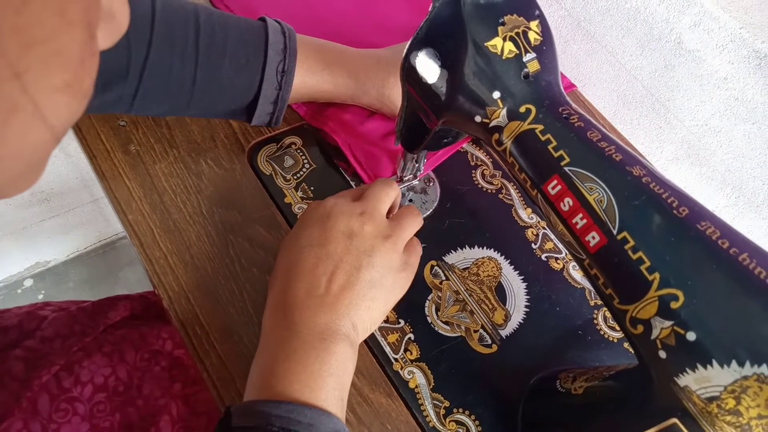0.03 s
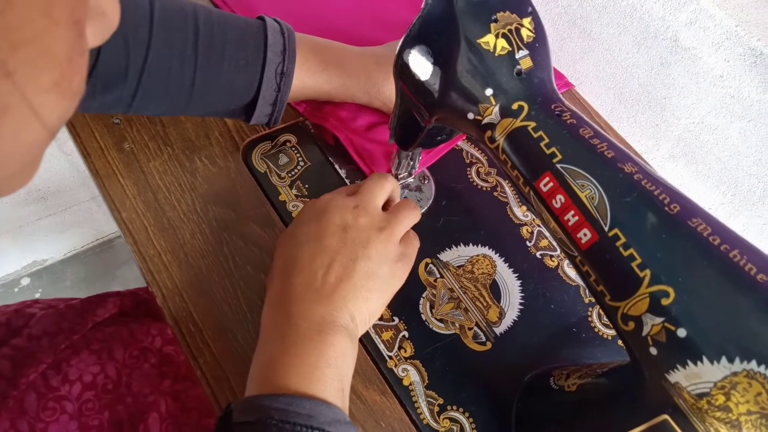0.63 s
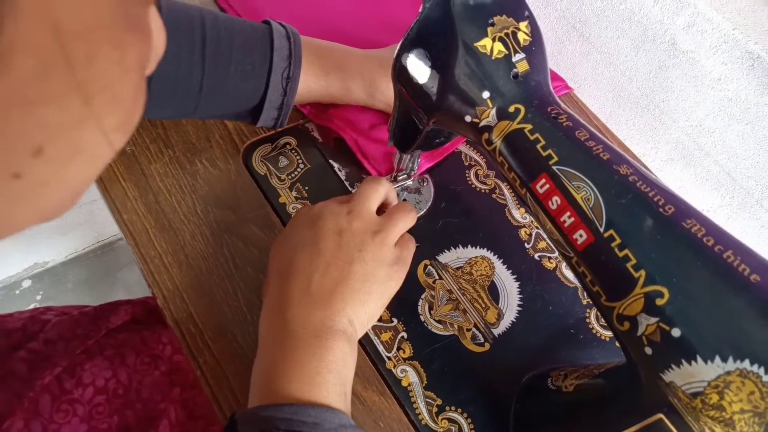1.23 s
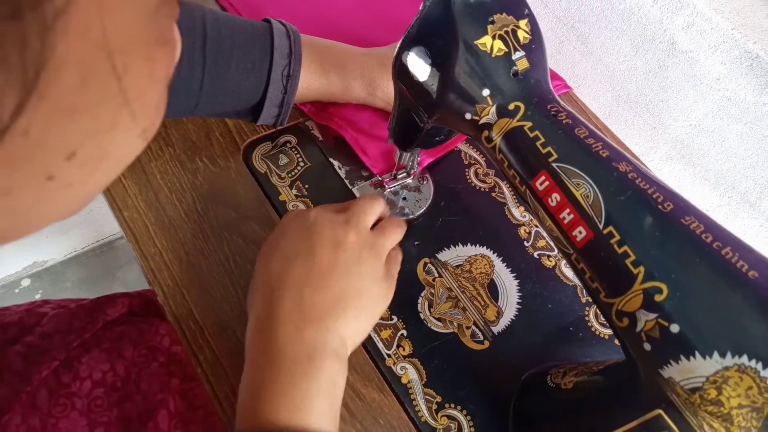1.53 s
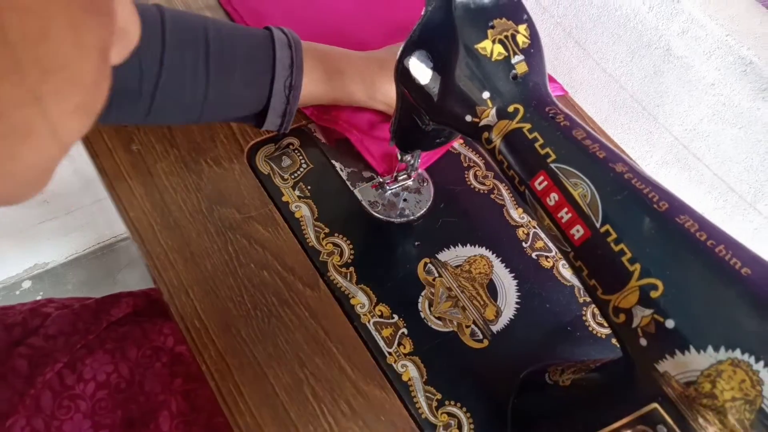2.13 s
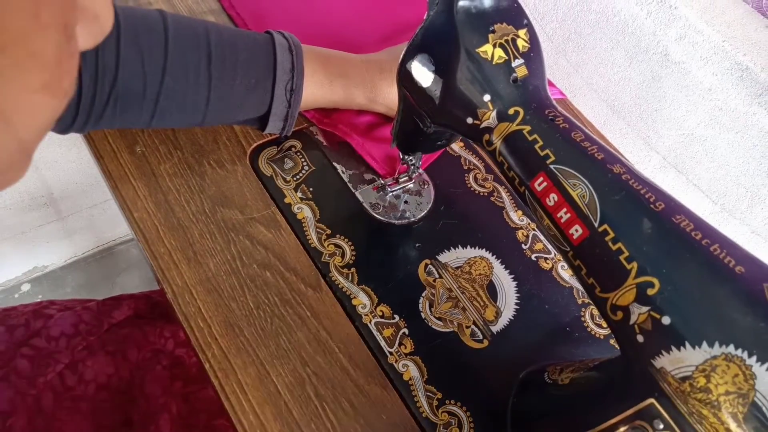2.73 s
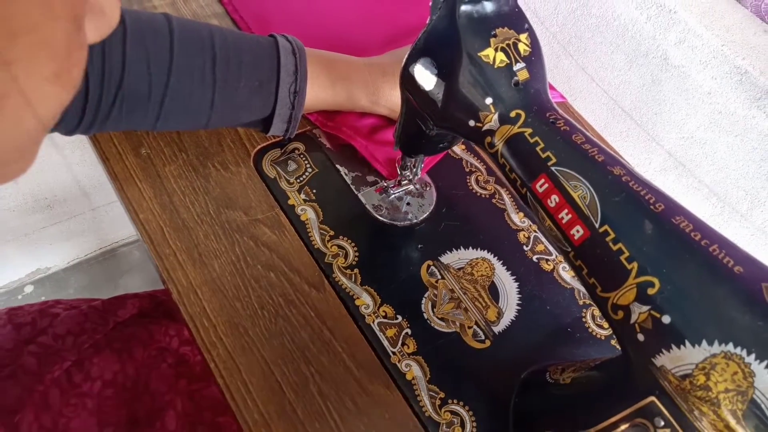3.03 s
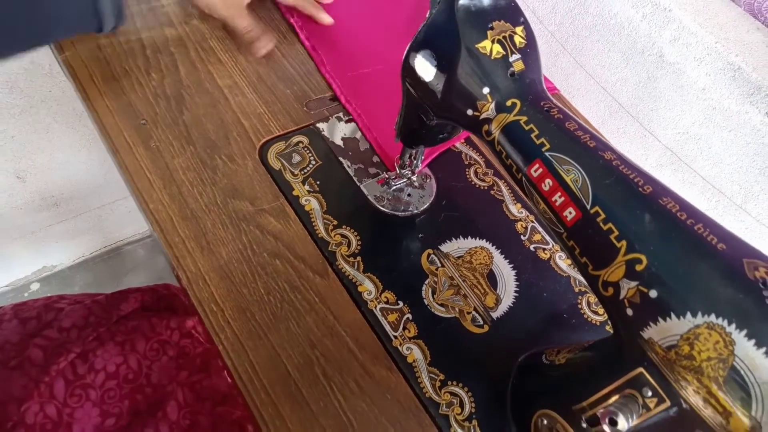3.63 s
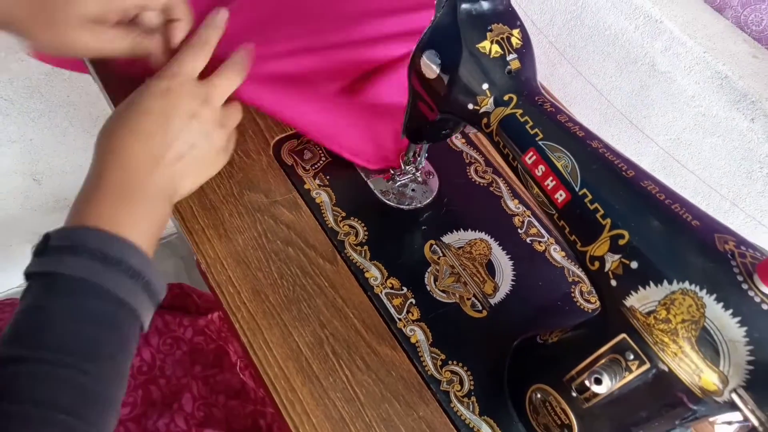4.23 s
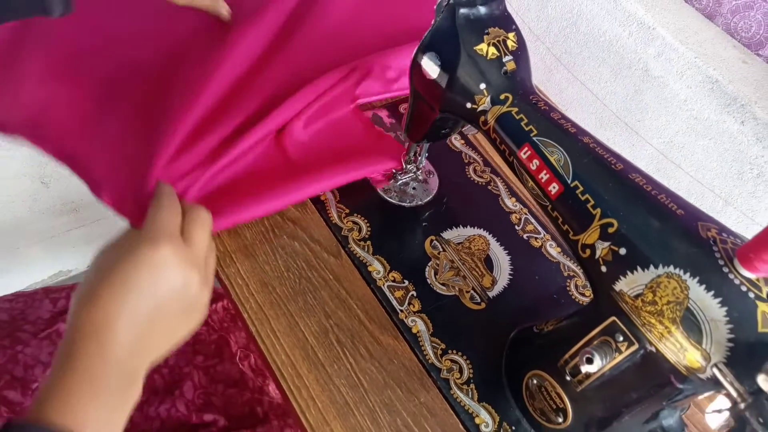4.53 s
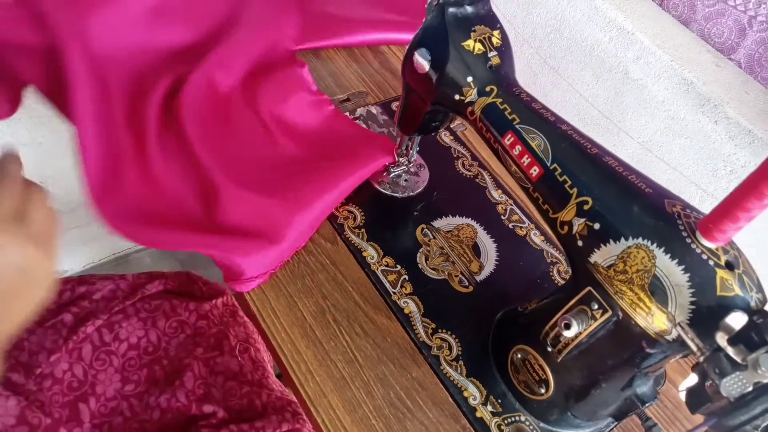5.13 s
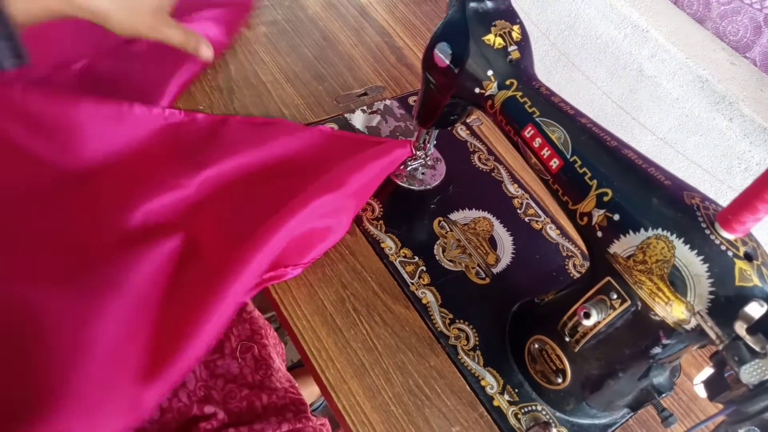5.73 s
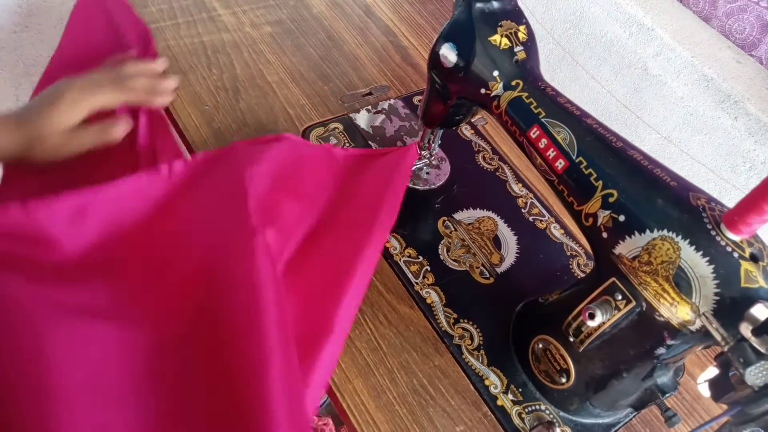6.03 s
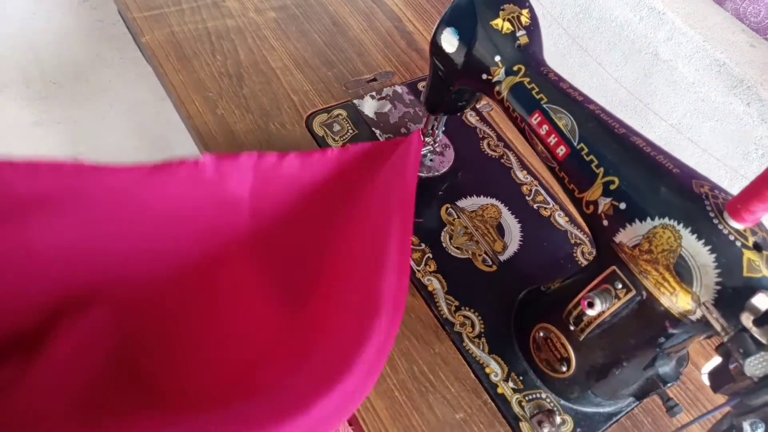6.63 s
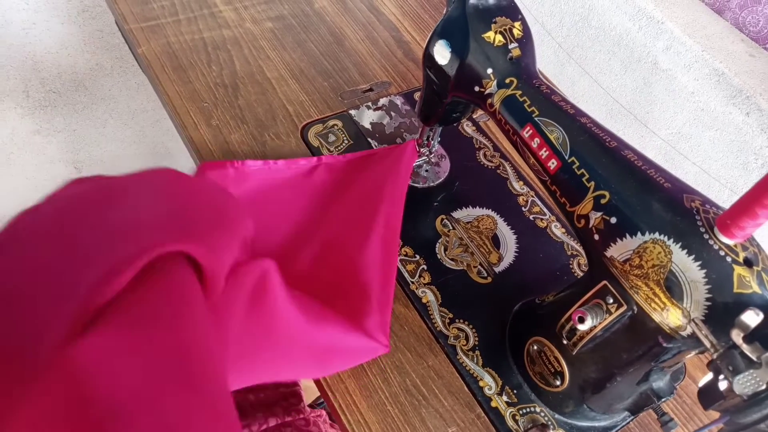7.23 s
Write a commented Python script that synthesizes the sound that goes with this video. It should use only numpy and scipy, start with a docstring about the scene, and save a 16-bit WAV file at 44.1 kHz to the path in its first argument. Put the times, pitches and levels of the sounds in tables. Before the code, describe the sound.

From the start, an iron treadle sewing machine stitches close by at about six strokes a second, a loud metallic clacking with a loose rattle and low thuds through its wooden table. Around 1.4 seconds it slows, with two dull knocks, and its last clacks die away by about 2.1 seconds. Near 2.4 to 2.5 seconds a small steel lever clicks and rings briefly as the treadle settles. The rest is much quieter. Short scuffs and soft bumps on wood come between 2.8 and 3.7 seconds. From about 3.2 seconds to the end, satin slides over the machine bed in repeated, overlapping soft hisses. A thread ticks near 4.4 seconds, a fold flicks at 6.5, and gentle table knocks fall around 4.4, 5.6, 6.5 and 7 seconds. A distant fan hums faintly in the small room throughout.

```python
"""Treadle sewing machine and satin

A cast-iron treadle machine on a wooden table sews six stitches a second, slows and stops. Each blow
of its mechanism excites the damped modes of iron, steel and wood. A lever is flicked, a hand knocks
the table, and satin pulled across the bed hisses by stick-slip friction.
A distant fan hums faintly in the small room."""
import sys
import numpy as np
from scipy import signal
from scipy.fft import rfft, irfft
from scipy.io import wavfile
from scipy.ndimage import map_coordinates

SR = 44100
rng = np.random.default_rng(int(sys.argv[2]) if len(sys.argv) > 2 else 0)


def store_pcm(level_fs):
    """Save levels as 16-bit WAV."""
    pcm = np.round(np.clip(level_fs, -1, 1) * 32767).astype(np.int16)
    wavfile.write(sys.argv[1], SR, np.atleast_2d(pcm).T)


N = 330309
TIME = np.arange(N) / SR


def amp(db):
    """Amplitude ratio of a level in decibels."""
    return 10 ** (np.asarray(db) / 20)


def unit(x):
    """Normalisation to an rms of 1."""
    return x / np.sqrt(np.mean(np.abs(x) ** 2) + 1e-20)


def wobble(knots_per_s):
    """Smooth random modulation: a spline through Gaussian values."""
    knots = rng.standard_normal(int(N * knots_per_s / SR) + 4)
    return map_coordinates(knots, [TIME * knots_per_s])


def add(track, start_s, sound):
    """Superposition: the part of a sound that falls inside the track is summed into it."""
    start = round(start_s * SR)
    part = sound[max(-start, 0):N - start]
    track[max(start, 0):][:len(part)] += part


def colour(points, hz):
    """Spectral envelope: gain interpolated in decibels over log frequency."""
    point_hz, db = np.transpose(points)
    return amp(np.interp(np.log(hz + 1), np.log(point_hz), db))


def resonances(modes, hz):
    """Incoherent summation: the gain of a cluster of modes whose powers add."""
    return np.sqrt(sum(amp(db) ** 2 / (1 + ((hz - f) / width) ** 2) ** 2 for f, width, db in modes))


def shaped(x, gain, rows):
    """Causal filtering: a minimum-phase response of unit power, proportional to gain(rows, hz)."""
    magnitude = unit(gain(rows, np.fft.rfftfreq(2 ** 14, 1 / SR)))
    cepstrum = irfft(np.log(np.maximum(magnitude, 1e-6)))
    half = len(cepstrum) // 2
    one_sided = np.r_[cepstrum[0], 2 * cepstrum[1:half], np.zeros(half)]
    impulse_response = irfft(np.exp(rfft(one_sided)))
    return signal.fftconvolve(x, impulse_response)[:N]


def strokes(rows, spectrum):
    """Transient contact: grainy noise swells along a Gaussian and decays exponentially."""
    envelope = np.zeros(N)
    for peak_s, db, rise_s, t60_s in rows:
        swell = np.exp(-(np.minimum(TIME - peak_s, 0) / rise_s) ** 2 / 2)
        envelope += swell * amp(db - 60 * np.maximum(TIME - peak_s, 0) / t60_s)
    grains = unit(amp(2.5 * wobble(500)) * rng.standard_normal(N))
    return shaped(envelope * grains, colour, spectrum)


# spectrum of the room's air noise: frequency_hz, gain_db
AIR_SPECTRUM = [(25, -29), (56, 5), (130, -9), (250, -9.5), (500, -13.5), (900, -14.5), (2000, -16.5),
                (3900, -19), (4400, -23.5), (5700, -33), (6700, -29.5), (7700, -23), (9800, -36.5),
                (15500, -42)]
# resonances in the fan's whirr: centre_hz, width_hz, gain_db
WHIRR_MODES = [(57.5, 20, -3), (82.5, 27, -2), (168, 22, -14), (311, 39, -7), (1100, 58, -6),
               (1790, 160, -11.5)]
# motor tones that drift in strength: pitch_hz, start_level_db, end_level_db
MOTOR_TONES = [(199, -62, -64), (650, -82, -94), (966, -74, -79), (1035, -67.5, -74.5), (1103, -68, -67.5),
               (1138, -84, -78), (1456, -82, -72.5), (1711, -58, -79), (1770, -80, -70), (1817, -89, -65),
               (2040, -58, -90), (2080, -96, -69)]

def distant_fan():
    """Broadband and tonal noise: soft moving air, a low whirr and the wavering tones of a motor."""
    air = amp(-59) * shaped(rng.standard_normal(N), colour, AIR_SPECTRUM)
    whirr = amp(-66) * shaped(rng.standard_normal(N), resonances, WHIRR_MODES)
    hum = np.zeros(N)
    for hz, start_db, end_db in MOTOR_TONES:
        envelope = amp(np.linspace(start_db, end_db, N) + 0.8 * wobble(5))
        hum += envelope * np.sin(2 * np.pi * hz * TIME + 0.6 * wobble(8))
    return air + whirr + hum


# pulls of satin over the bed: start_s, length_s, hiss_db, sheen_db
SATIN_PULLS = [(3.152, 0.25, -70.5, -78), (3.427, 0.26, -67.5, -76), (3.77, 0.56, -67, -71),
               (4.326, 0.27, -66, -72.5), (4.608, .28, -64, -70), (4.84, 0.45, -64.5, -73),
               (5.04, 0.17, -62, -69), (5.097, 1, -67.5, -77), (5.696, 0.46, -63.5, -66.5),
               (6.108, 0.74, -64.5, -69.5), (6.703, 0.7, -69.5, -80), (6.936, .62, -65, -68.5)]
# spectra of the sliding hiss and of its bright sheen: frequency_hz, gain_db
HISS_SPECTRUM = [(200, -0.5), (500, -3.5), (1000, -9.5), (1800, 2), (2600, 0), (3700, 1.5), (4600, -6),
                 (5700, -9.5), (6600, -6.5), (7600, -0.5), (8500, -5), (9700, -17), (11000, -24),
                 (15500, -19)]
SHEEN_SPECTRUM = [(2000, -2), (4000, -28), (6000, -1.5), (9000, 0.5), (11500, -5.5), (15500, -4.5)]

def sliding_satin():
    """Stick-slip friction: threads catch and slip, hissing louder as the cloth moves faster."""
    slips = amp(0.82 * wobble(300) + 0.8 * wobble(14))
    start_s, length_s, hiss_db, sheen_db = np.transpose(SATIN_PULLS)[:, :, None]
    progress = np.clip((TIME - start_s) / length_s, 0, 1)
    speed = (4 * progress * (1 - progress)) ** 0.26  # a flattened arch: each pull speeds up, then slows

    def rub(db, spectrum):
        friction = unit(shaped(slips * rng.standard_normal(N), colour, spectrum))
        return np.max(speed * amp(db), axis=0) * friction

    return amp(5.5) * rub(hiss_db, HISS_SPECTRUM) + amp(4) * rub(sheen_db, SHEEN_SPECTRUM)


# flicks of the satin's folds: peak_s, level_db, rise_s, t60_s
FOLD_FLICKS = [(2.927, -66, .005, 0.098), (4.362, -61, .004, .08), (6.48, -53, 0.013, 0.34)]
# spectrum of a flick: frequency_hz, gain_db
FLICK_SPECTRUM = [(400, -25), (2000, 3), (5500, -5), (8000, -1), (10500, -3), (15000, -14)]

def satin_folds():
    """Sudden tension: a fold snapping straight radiates a short, bright burst."""
    return strokes(FOLD_FLICKS, FLICK_SPECTRUM)


# slips of the thread: start_s, level_db
THREAD_SLIPS = [(4.3593, -41), (4.367, -41), (4.3797, -47)]

def thread_ticks():
    """Impulsive release: a taut thread slips with tiny dry ticks."""
    track, t = np.zeros(N), np.arange(SR // 100) / SR
    for start_s, db in THREAD_SLIPS:
        add(track, start_s, amp(db - 60 * t / 0.0044) * rng.standard_normal(len(t)))
    return shaped(track, colour, [(1500, -12), (4000, -6), (8000, 12), (11000, -18), (15000, -14)])


# things pushed over the table: peak_s, level_db, rise_s, t60_s
TABLE_SCUFFS = [(2.926, -52.5, 0.0046, 0.12), (3.055, -54, 0.0044, 0.088), (3.36, -60, 0.007, .08),
                (3.531, -46, 0.003, 0.11), (3.547, -44, 0.0045, 0.22), (3.642, -55, 0.011, .1)]
# spectrum of a scuff on wood: frequency_hz, gain_db
SCUFF_SPECTRUM = [(120, -33), (300, -11), (500, -8), (750, 1), (1000, -3.5), (1350, -3), (2600, -6),
                  (3200, -14), (3800, -3), (4500, -27), (7600, -17), (15000, -40)]

def table_scuffs():
    """Sliding friction: short pushes over wood make grainy noise."""
    return strokes(TABLE_SCUFFS, SCUFF_SPECTRUM)


# soft knocks from the slowing machine, then from hand and arm: start_s, level_db, pitch_hz
TABLE_BUMPS = [(1.419, -23.5, 161), (1.645, -26, 161.5), (2.329, -42.5, 162), (2.419, -32.5, 155),
               (2.504, -45, 158), (2.78, -53, 632), (3.049, -52, 832), (3.299, -49.5, 312),
               (3.464, -47, 172), (3.475, -49, 320), (4.448, -48, 160), (5.644, -41, 307),
               (5.665, -43.5, 163), (6.478, -47.5, 188), (7.019, -43, 274), (7.339, -50.5, 270)]

def table_bumps():
    """Damped free vibration: a soft knock excites one note of the table and a dull thud."""
    track, t = np.zeros(N), np.arange(SR // 3) / SR
    attack_s, note_t60_s, thud_t60_s = 0.0044, 0.15, 0.3
    thud_band = signal.butter(2, [140, 400], "band", fs=SR, output="sos")
    for start_s, db, hz in TABLE_BUMPS:
        note = np.sin(2 * np.pi * hz * t) * -np.expm1(-t / attack_s) * amp(-60 * t / note_t60_s)
        thud = unit(signal.sosfilt(thud_band, rng.standard_normal(len(t))))
        add(track, start_s, amp(db) * (note + thud * amp(-14 - 60 * t / thud_t60_s)))
    return track


# knocks of treadle and lever: peak_s, level_db, rise_s, t60_s
SETTLING_KNOCKS = [(2.142, -45, .0015, 0.13), (2.327, -42, 0.00084, 0.095), (2.502, -39, .001, .14)]
# spectrum of a treadle knock: frequency_hz, gain_db
KNOCK_SPECTRUM = [(150, 4), (450, -13), (750, -3), (1100, -1), (1500, 0), (2100, -4), (3000, -4),
                  (4000, -25), (7000, -24), (15000, -45)]

def treadle_knocks():
    """Heavily damped impact: dull knocks as the treadle settles and the lever drops."""
    return strokes(SETTLING_KNOCKS, KNOCK_SPECTRUM)


# clacks that excite the lever: start_s, level_db
LEVER_STRIKES = [(1.86, -41), (2.011, -56), (2.049, -50), (2.418, -46), (2.503, -44), (2.525, -41.5)]
# modes of the lever: centre_hz, width_hz, gain_db
LEVER_MODES = [(815, 28, 0), (1840, 16, 1), (2150, 9.9, 5), (3386, 12, -14), (7564, 23, -2),
               (8260, 160, -3.5), (9100, 40, -15), (10860, 58, -14)]

def lever_ring():
    """Resonance: as the machine comes to rest, single clacks leave a small steel lever ringing."""
    drive, t = np.zeros(N), np.arange(SR // 2) / SR
    for start_s, db in LEVER_STRIKES:
        add(drive, start_s, amp(db - 60 * t / 0.18) * rng.standard_normal(len(t)))
    return shaped(drive, resonances, LEVER_MODES)


def ringing(t, attack_s, t60_s, tail_db, tail_t60_s):
    """Double-slope decay: a dense ring dies quickly into the longer tail of table and room."""
    envelope = np.hypot(amp(-60 * t / t60_s), amp(tail_db - 60 * t / tail_t60_s))
    return -np.expm1(-t / attack_s) * envelope * rng.standard_normal(len(t))


# turns of the shaft, timed from the needle's strike: start_s, length_s, strength_db, shake_db
SHAFT_TURNS = [(-.015, 0.14, -1, 2), (.133, 0.15, -1.5, 3.5), (.288, 0.17, -1.6, 7), (.444, .15, -6, -1),
               (.594, .152, -.5, 0), (.753, 0.15, -1.74, 0), (.907, .155, -1, 0), (1.063, 0.17, -1.5, 2),
               (1.236, 0.17, -1.5, -1), (1.414, 0.2, -2, 0.5)]
# blows of one turn: place_turns, level_db, steel_db, thud_db
# in order: take-up lever, needle bar, its two rebounds, bar settling, thread drawn tight,
# shuttle reversing, feed dog, its drop, feed returning
TURN_BLOWS = [(-.075, -21.5, -5.5, -22), (-.001, -8.5, -8, -21), (.06, -6.2, -9, -27.5),
              (.098, -11, -6, -19.5), (.19, -27.5, -12, -8), (.29, -25, -9, -14.5), (.442, -12.5, -16, -24),
              (.585, -19.5, -18.5, -17.5), (.635, -28, -13, -8), (.71, -30, -5, -7)]

def stitching():
    """Cyclic excitation: every turn of the shaft repeats the same blows, spread wider as it slows."""
    scatter_s, scatter_db = 0.0004, 0.8
    blows = []
    for start_s, length_s, strength_db, shake_db in SHAFT_TURNS:
        for place, db, steel_db, thud_db in TURN_BLOWS:
            late_s, harder_db = rng.standard_normal(2) * [scatter_s, scatter_db]
            blow_s = start_s + place * length_s + late_s
            blows.append((blow_s, db + strength_db + harder_db, steel_db, thud_db + shake_db))
    return blows


# clacks of the stopping machine, then of the flicked lever: start_s, level_db, steel_db, thud_db
SINGLE_CLACKS = [(1.623, -15, -7, -19), (1.643, -6.5, -13.5, -18.5), (1.673, -11, -7, -24),
                 (1.725, -31.5, -4, -30), (1.754, -32, -8, -11), (1.811, -27, -7.5, -14),
                 (1.848, -18, -15.5, -33), (1.864, -31, -14, -31), (1.944, -24.5, -19.5, -35),
                 (2.007, -26.5, -16.5, -34), (2.019, -27.5, -20, -33), (2.042, -19, -14, -40),
                 (2.414, -28.5, -9, -12), (2.428, -30, -21.5, -4.5), (2.485, -29, -18, -16),
                 (2.501, -22.5, -20, -21), (2.525, -24.5, -12.5, -20)]
# rattle of the loose linkage while the shaft turns: time_s, level_db
LINKAGE_RATTLE = [(0, -43), (1.4, -42), (1.8, -44), (2.06, -51.5), (2.15, -65), (2.3, -88), (2.6, -100)]
# spectrum of a blow's contact noise: frequency_hz, gain_db
CONTACT_SPECTRUM = [(40, -36), (150, -0.5), (480, 2), (900, 0.5), (3800, 4), (6000, -5), (8000, -0.5),
                    (10000, -29), (15500, -9)]
# modes of the iron arm and bed, small steel parts and wooden table: centre_hz, width_hz, gain_db; the steel
# rows near 7.5-7.8 kHz hold a bright lift that runs through every sound of the scene
IRON_MODES = [(515, 27, -7.5), (546, 55, -9.5), (654.4, 6.6, -0.5), (802, 82, 0.5), (867, 56, -3.5),
              (1038, 40, -3.5), (1107, 23, -7), (1180, 16, -7), (1206, 29, 0.0), (1271, 20, 1),
              (1412, 23, -1.5), (1520, 41, -3.5), (1663, 82, -3), (1785, 47, -4.5), (1848, 22, 1),
              (1948, 44, 1.5), (2020, 46, -8.5), (2090, 16, 2), (2168, 34, -0.5), (2280, 127, -3.5),
              (2540, 210, -8.5), (2775, 100, -7), (2850, 29, -7), (2880, 36, 1.5), (3006, 41, -0.5),
              (3190, 155, -2.5), (3367, 153, -1), (3657, 86, -1.5), (3772, 59, 0.5), (3874, 98, -3.5),
              (3956, 77, -5)]
STEEL_MODES = [(4290, 1220, -6), (5170, 44, -8), (5490, 240, -13), (6000, 140, -6.5), (6530, 110, -6),
               (7030, 180, -6.5), (7455, 250, 2), (7800, 480, -8), (8340, 860, -5), (8290, 190, -1.0),
               (9350, 72, -12), (10050, 610, -12.5), (10950, 530, -13.5), (12850, 1260, -13),
               (13800, 890, -12)]
TABLE_MODES = [(140, 15.5, -6), (162.8, 11.7, -1), (254.7, 30.5, -6.5), (320.8, 14.4, -3.5), (383, 45, -12),
               (428, 9.7, -12)]

def sewing_machine():
    """Modal excitation by impact: blows and a rattling linkage drive iron, steel and table."""
    iron, steel, table = np.zeros((3, N))
    t = np.arange(SR // 3) / SR
    for start_s, db, steel_db, thud_db in stitching() + SINGLE_CLACKS:
        rise_s = 0.0006 * amp(-steel_db)  # a duller blow is a softer contact and builds more slowly
        clack = ringing(t, attack_s=rise_s, t60_s=0.079, tail_db=-6, tail_t60_s=0.19)
        click = ringing(t, attack_s=0.58 * rise_s, t60_s=0.077, tail_db=-8.5, tail_t60_s=0.22)
        thud = ringing(t, attack_s=0.00075, t60_s=0.082, tail_db=-10, tail_t60_s=0.16)
        add(iron, start_s, amp(db - 9) * clack)
        add(steel, start_s, amp(db + steel_db - 6.5) * click)
        add(table, start_s, amp(db + thud_db - 2.5) * thud)
    rattle_db = np.interp(TIME, *np.transpose(LINKAGE_RATTLE))
    rattle = amp(rattle_db) * unit(amp(3 * wobble(150)) * rng.standard_normal(N))
    # metal faces rebound within each blow, the small steel parts fastest
    chatter = unit(amp(1.3 * wobble(600)))
    buzz = unit(amp(1.6 * wobble(3000)))
    iron = (iron + rattle) * chatter
    steel = (steel + amp(-10) * rattle) * chatter * buzz
    table = table + amp(-7) * rattle
    contact = amp(-7.5) * shaped(iron, colour, CONTACT_SPECTRUM)
    parts = [(iron, IRON_MODES), (steel, STEEL_MODES), (table, TABLE_MODES)]
    return contact + sum(shaped(drive, resonances, modes) for drive, modes in parts)


def scene():
    """Linear superposition: handling, machine and fan sum in one channel."""
    handling = table_bumps() + table_scuffs() + sliding_satin() + satin_folds() + thread_ticks()
    machine = sewing_machine() + lever_ring() + treadle_knocks()
    return (distant_fan() + handling + machine)[None]


def record(dry):
    """Band limiting: the microphone channel sheds deep bass and the highest treble."""
    thin = signal.sosfilt(signal.butter(3, 45, "high", fs=SR, output="sos"), dry)
    low_pass = signal.firwin(501, cutoff=15800, fs=SR)
    return signal.fftconvolve(thin, low_pass[None], "same")


dry = scene()
out = record(dry)
store_pcm(out)
```